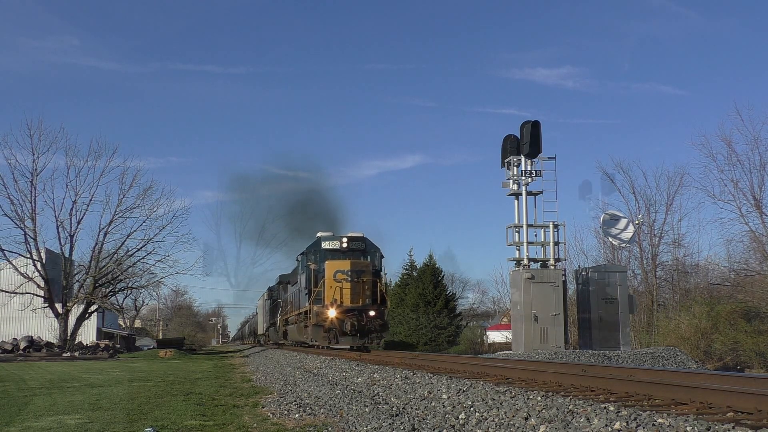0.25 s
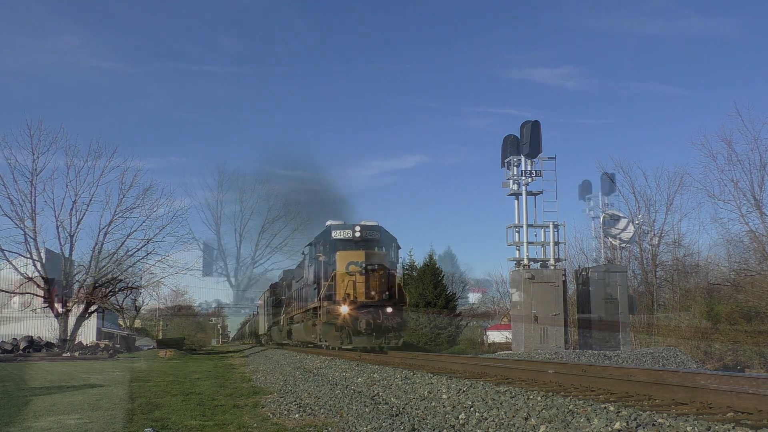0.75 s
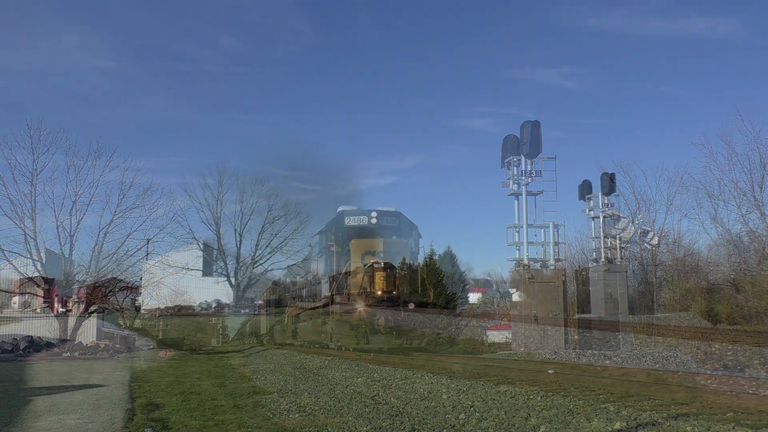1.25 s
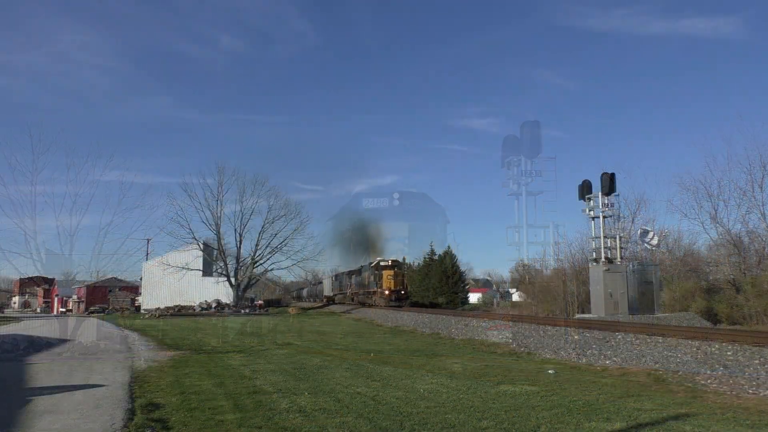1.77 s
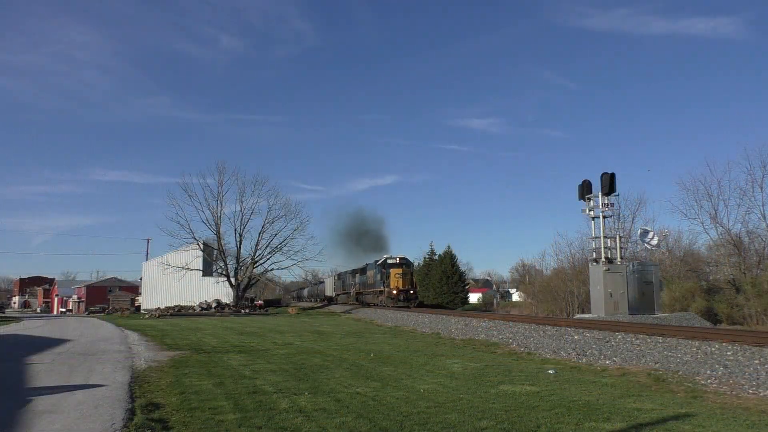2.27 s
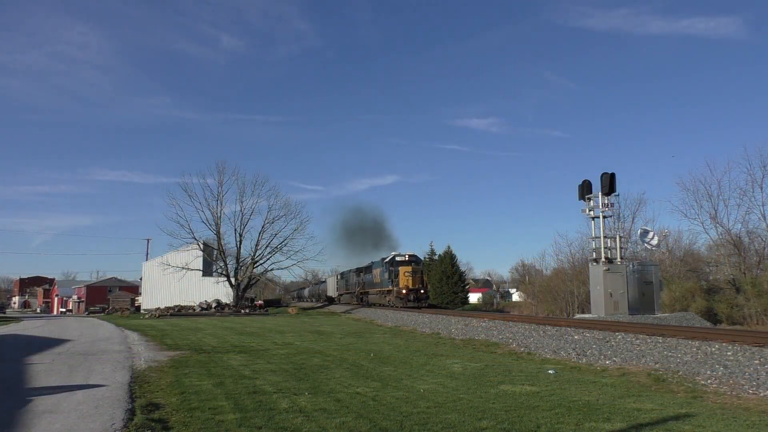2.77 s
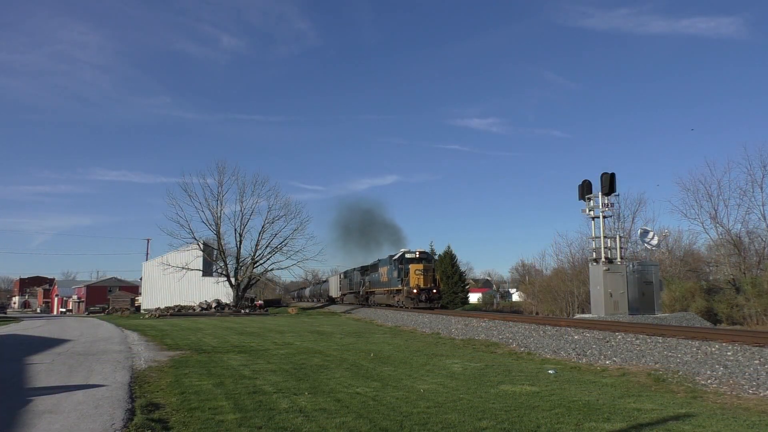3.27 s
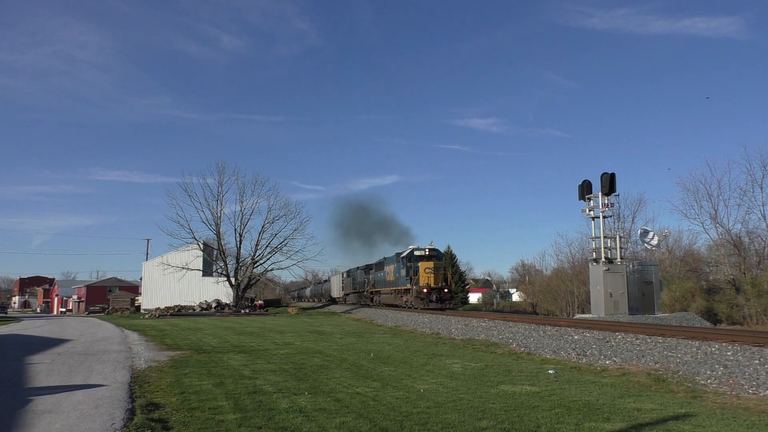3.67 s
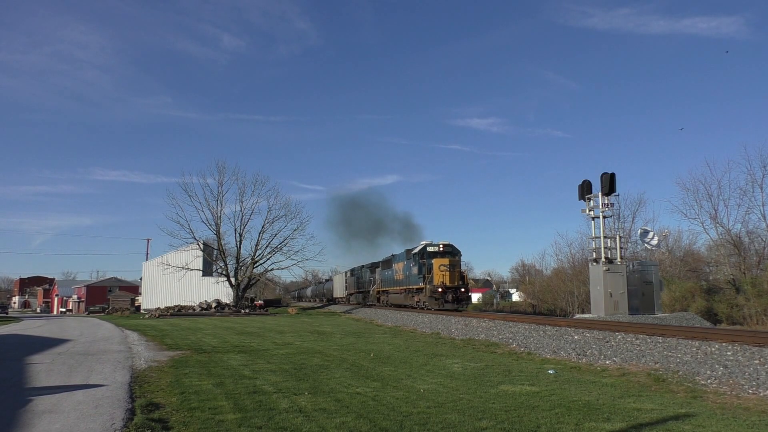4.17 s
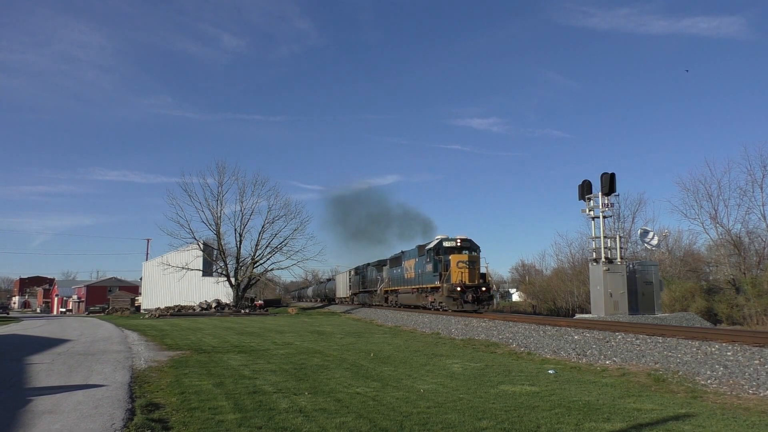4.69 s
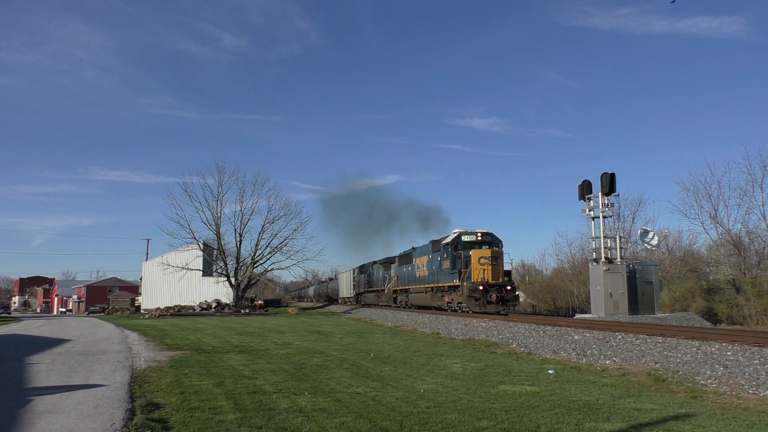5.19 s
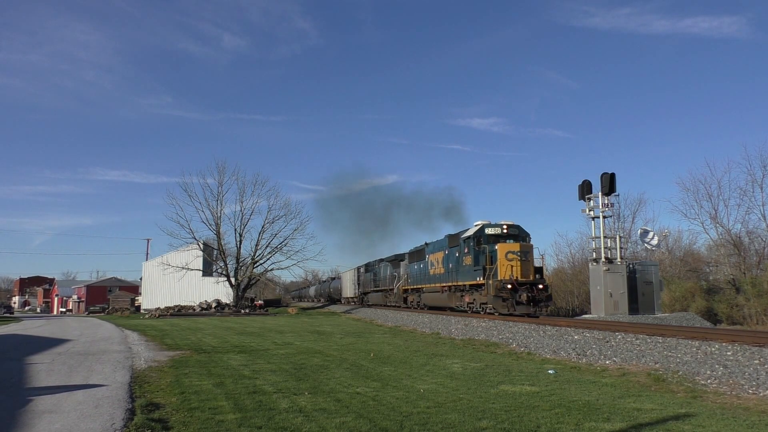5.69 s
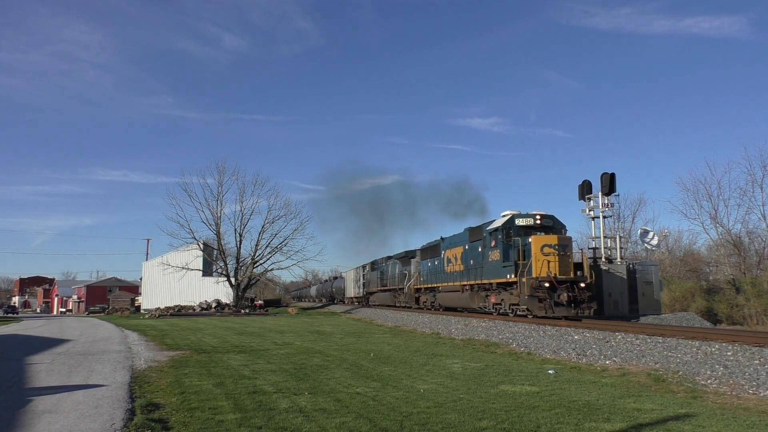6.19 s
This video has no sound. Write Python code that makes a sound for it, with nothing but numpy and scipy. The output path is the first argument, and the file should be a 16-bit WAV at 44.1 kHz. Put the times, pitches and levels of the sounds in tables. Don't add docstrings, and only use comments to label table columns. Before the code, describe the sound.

A close stereo microphone catches full, heavy diesel rumble and roar after a small low thump. It blends smoothly into a mono trackside perspective, duller at first. There the two engine pulses beat against each other, sag very slightly in pitch, and grow brighter with wheel hiss, light regular valve ticks and irregular clacks from joints and couplings. The train is still approaching when it stops.

```python
import sys
import numpy as np
from scipy import signal
from scipy.io import wavfile
from scipy.ndimage import uniform_filter1d, map_coordinates

SR = 44100
rng = np.random.default_rng(int(sys.argv[2]) if len(sys.argv) > 2 else 0)


def store_pcm(level_fs):
    pcm = np.round(np.clip(level_fs, -1, 1) * 32767).astype(np.int16)
    wavfile.write(sys.argv[1], SR, np.atleast_2d(pcm).T)


def ratio_of_db(decibels):
    return 10 ** (np.asarray(decibels, float) / 20)


N = 284004
T = np.arange(N) / SR
HZ = np.fft.rfftfreq(1024, 1 / SR)

# (time [s], four-stroke rate [cycles/s], two-stroke rate [turns/s])
CRANK_RATES = [(0, 8.945, 15.232), (3, 8.94, 15.238), (4.6, 8.935, 15.245), (5.4, 8.905, 15.236),
               (6.44, 8.86, 15.228)]
# (frequency [Hz], lead [rad])
LEFT_LEAD = [(0, 0), (1030, 2.2), (1720, 3.7), (1980, 5.5), (2240, 5.2), (2840, 5.8), (3270, 5.8),
             (3790, 4.9), (4050, 5.2), (4480, 5.1), (6460, 6.3), (12100, 6.2), (12500, 6.0), (15300, 6.5)]
# (frequency [Hz], density [dB/Hz])
RUMBLE_COLOUR = [(20, -36), (45, -20), (70, 13), (125, 9), (170, 10.5), (230, 8.5), (330, -47.5)]


def evened(x):
    return x / np.sqrt(np.mean(abs(x) ** 2) + 1e-20)


def read(points, hz):
    f, value = np.transpose(points)
    return np.interp(np.log(hz + 1), np.log(f + 1), value)


def drift(rate_hz):
    knots = rng.standard_normal(200)
    coarse = map_coordinates(knots, [T[::64] * np.clip(rate_hz, .1, 30)], order=3)
    return coarse.repeat(64)[:N]


def field(patchy_db, frames_wide, bins_wide):
    a, b, c, d, patches = rng.standard_normal((N // 256 + 5, 513, 5)).T
    patches = uniform_filter1d(patches, int(bins_wide), 0)
    patches = evened(uniform_filter1d(patches, int(frames_wide), 1))
    return np.array([a + 1j * b, c + 1j * d]) * ratio_of_db(patchy_db * patches)


def sound(z):
    return evened(signal.istft(z, nperseg=1024, noverlap=768)[1][..., :N])


def coloured(z, colour):
    return sound(z * ratio_of_db(read(colour, HZ))[:, None])


def band(x, lo_hz, hi_hz):
    return signal.sosfilt(signal.butter(4, [lo_hz, hi_hz], "band", fs=SR, output="sos"), x)


def distance(s):
    return 100 - 12 * s


def cycles():
    s, four, two = np.transpose(CRANK_RATES)
    return [2 * np.pi * np.cumsum(np.interp(T, s, rate)) / SR for rate in (four, two)]


def exhausts(angles):
    # (multiple of crank rate, close rms [dB], far rms [dB], echo phase at echo_at_s [turns])
    four_stroke = [(3, -70, -50, 0.54), (4, -52, -44, 0.62), (5, -48, -43, 0.76), (6, -53, -42, 0.6),
                   (7, -41, -39, 0.98), (8, -35, -27, 0.68), (9, -46, -36, 0.1), (10, -45, -31, 0.84),
                   (11, -26, -22, 0.5), (12, -35, -27, 0.16), (13, -34, -28, 0.62), (14, -32, -36, 0.18),
                   (15, -51, -40, 0.96), (16, -33, -25, 0.36), (18, -46, -38, 0.38), (19, -48, -38, 0.04),
                   (20, -40, -38, 0.02), (21, -47, -47, 0.94), (22, -48, -43, 0.96), (24, -48, -46, 0.92),
                   (25, -52, -47, 0.6), (26, -48, -41, 0.96), (27, -47, -45, 0.0), (29, -45, -46, 0.94)]
    # (multiple of crank rate, close rms [dB], far rms [dB], echo phase at echo_at_s [turns])
    two_stroke = [(3, -50, -44, 0.8), (4, -60, -36, 0.94), (5, -37, -36, 0.88), (6, -48, -32, 0.76),
                  (8, -30, -23, 0.84), (9, -36, -30, 0.98), (10, -22, -23, 0.18), (11, -32, -31, 0.5),
                  (13, -60, -45, 0.7), (14, -50, -43, 0.5), (16, -52, -51, 0.16), (24, -45, -49, 0.82)]
    echo_share, echo_ms_per_s, echo_at_s = (.7, .5), (.8, 2.62), 4.0
    throb_turns, throb_shape_turns = .33, .46
    close, far = np.zeros((2, N)), np.zeros(N)
    engines = zip(angles, (four_stroke, two_stroke), CRANK_RATES[0][1:], (False, True), echo_share, echo_ms_per_s)
    for angle, orders, rate_hz, in_step, echo, ms_per_s in engines:
        for k, close_db, far_db, echo_turns in orders:
            hz = k * rate_hz
            start_turns = rng.random(2)[0]
            if in_step:
                start_turns = k * throb_turns + throb_shape_turns
            far_start = 2 * np.pi * start_turns
            close_start = 2 * np.pi * (start_turns + k * .4)
            waver = ratio_of_db(1.5 * drift(2.4))
            wobble = .32 * drift(3.0)
            lead = np.interp(hz, *np.transpose(LEFT_LEAD)) * np.array([[.5], [-.5]])
            detour = 2 * np.pi * (hz * ms_per_s / 1000 * (T - echo_at_s) - echo_turns)
            wall = np.sqrt(1 + echo ** 2 + 2 * echo * np.cos(detour))
            close += ratio_of_db(close_db) * waver * np.cos(k * angle + close_start + wobble + lead)
            far += ratio_of_db(far_db) * wall * waver * np.cos(k * angle + far_start + wobble)
    sag_db = 0.6 - 5.5 * np.maximum(T - 0.42, 0)
    veil_db = -.2 + np.interp(T, (.6, 1.43), (-6., 0))
    gap_db = 3. * np.exp(-((T - 3.46) / 0.27) ** 2)
    return np.sqrt(2) * close * ratio_of_db(sag_db), np.sqrt(2) * far * ratio_of_db(veil_db + gap_db)


def close_roar():
    # (frequency [Hz], density [dB/Hz])
    roar_colour = [(120, -32), (200, -8), (287, -5), (326, -3), (427, -11), (683, -9.5), (775, -14.5),
                   (880, -12.5), (1170, -16), (1410, -19), (4550, -27.5), (13200, -51.5), (15000, -86)]
    # (frequency [Hz], correlation [0-1])
    likeness = [(60, 0.5), (300, 0.94), (700, 0.95), (1400, 0.21), (3000, 0.62), (6000, 0.55), (15000, 0.3)]
    # (frequency [Hz], left over right [dB])
    tilt = [(60, 0.0), (110, 0.0), (200, 0.0), (380, 2.5), (700, 4.5), (1290, 8.0), (2380, 7.0),
            (4400, 3.5), (8120, 0.5), (15000, 1.5)]
    a, b = field(1.0, 13, 10)
    same = np.clip(read(likeness, HZ), 0, 1)[:, None]
    lead = np.interp(HZ, *np.transpose(LEFT_LEAD))
    port = (ratio_of_db(read(tilt, HZ) / 2) * np.exp(.5j * lead))[:, None]
    z = np.array([a * port, (same * a + np.sqrt(1 - same ** 2) * b) / port])
    return ratio_of_db(-27.5) * coloured(z, roar_colour) + ratio_of_db(-29.5) * coloured(z, RUMBLE_COLOUR)


def splices():
    # (time [s], jump [dB])
    steps = [
        (.01828, -7.5),
        (2.0205, -29),
        (1.4466, -39),
    ]
    return sum(ratio_of_db(db) / 2 * np.sign(T - s) * np.exp(-abs(T - s) / 0.0011) for s, db in steps)


def whines():
    # (frequency [Hz], rms [dB])
    pitches = [(357.3, -50.5), (411.1, -50.5), (482.5, -50), (556, -43.5), (565.4, -53.5), (725, -47),
               (845.3, -51), (1111, -49), (1204, -53.5), (1721, -54.5)]
    tones = [ratio_of_db(db + 2.9 * drift(2.48)) * np.sin(2 * np.pi * hz * T + 1.34 * drift(3.0)) for hz, db in pitches]
    return np.sqrt(2) * sum(tones)


def layer_gain(level_db, share, loss_db_per_m):
    # (time [s], exposure [dB])
    exposure = [(.6, -7.5), (1.2, -6), (1.6, -6.5), (2.05, -5), (2.5, -5), (2.64, -2), (2.78, -2.5),
                (2.95, -1.6), (3.45, -0.4), (3.95, 0.2), (4.15, -.9), (4.4, 0.9), (4.65, -1.2), (5.1, 0.1),
                (5.3, 0.9), (5.55, 0.3), (6.05, 1.3), (6.44, 0.9)]
    exposure_db = np.interp(T, *np.transpose(exposure))
    return ratio_of_db(level_db + share * exposure_db - loss_db_per_m * distance(T))


def valve_gate(angle):
    beat = 3 * (angle - angle[round(3.246 * SR)]) / (2 * np.pi) + 300
    strength = rng.uniform(.2, 1.4, 600)[beat.astype(int)]
    age = (beat % 1) / 0.073
    return strength * age * np.exp(1 - age)


def far_roar(angle):
    # (frequency [Hz], density [dB/Hz])
    roar_colour = [(120, -42), (200, -7.5), (232, -8), (281, -5.5), (455, -8.5), (562, -6.5), (919, -14),
                   (1630, -20), (2200, -20), (2860, -46), (4840, -120)]
    # (frequency [Hz], density [dB/Hz])
    rail_colour = [(1000, -7), (1700, -10), (2110, -7), (2430, -5), (3140, 0), (3590, -3.5), (3890, -6.5),
                   (5600, -17), (7280, -33), (12300, -120)]
    # (frequency [Hz], density [dB/Hz])
    fizz_colour = [(2820, -40), (4800, -3.5), (6270, -0.5), (9670, -16.5), (11800, -25.5), (15300, -49),
                   (22000, -120)]
    # (frequency [Hz], density [dB/Hz])
    air_colour = [(9000, -23), (10500, -10), (11800, -8), (12400, -3), (13000, 1), (13500, -4),
                  (13900, -16), (15700, -26), (16000, -59)]
    low, mid = field(0.69, 14, 7.2)
    high, top = field(1.4, 5, 14)
    gate = valve_gate(angle)
    rumble = ratio_of_db(-26.5 + 0.6 * drift(2.32)) * coloured(low, RUMBLE_COLOUR)
    roar = layer_gain(-25, 0.49, .04) * coloured(mid, roar_colour)
    rails = layer_gain(-30, 0.97, 0.0087) * coloured(high, rail_colour) * evened(1 + 0.17 * gate)
    fizz = layer_gain(-41.5, 1.25, 0.094) * coloured(top, fizz_colour) * evened(1 + 0.39 * gate)
    early_air = ratio_of_db(-59 - 13.5 * T)
    air_gain = layer_gain(-49, .3, 0.46) + early_air
    air = air_gain * coloured(low, air_colour) * evened(1 + .25 * gate)
    return rumble + roar + rails + fizz + air


def ticks(angle):
    # (time [s], peak [dB])
    extra_ticks = [(2.2244, -41), (2.2364, -43), (2.6194, -42), (2.6604, -31), (2.82, -39), (2.9934, -43.5),
                   (3.8374, -38), (3.9934, -38), (4.0064, -36), (4.0287, -34), (4.0674, -37), (4.143, -25),
                   (4.1584, -27), (4.2574, -30), (4.3164, -35), (4.365, -25), (4.9317, -27), (5.3378, -31),
                   (5.7488, -37), (5.8614, -31.5), (5.9743, -30), (6.2447, -21)]
    valve_from_s, valve_at_s = 2.85, 3.2485
    turns = np.floor((angle - angle[round(valve_at_s * SR)]) / (2 * np.pi))
    beats = T[1:][(np.diff(turns) > 0) & (T[1:] > valve_from_s)]
    valve_db = -28 - .17 * distance(beats) + 2.5 * rng.standard_normal(60)[:len(beats)]
    rows = list(extra_ticks) + list(zip(beats, valve_db))
    out, t = np.zeros(N), np.arange(800) / SR
    shape = (1 - np.exp(-t / 0.0025)) ** 2 * np.exp(-t / 0.004)
    for (s, db), puff in zip(rows, rng.standard_normal((len(rows), len(t)))):
        at = round(s * SR)
        out[at:at + len(t)] += (ratio_of_db(db - 3.5) * puff * shape)[:N - at]
    return band(out, 4800, 9400) + ratio_of_db(-2.8) * band(out, 2300, 4600)


def knocks():
    # (time [s], peak [dB], lowest [Hz], highest [Hz], decay [s])
    joints = [
        (2.6735, -25., 3800, 6400, .004),
        (3.991, -17.5, 1400, 4800, .005),
        (4.006, -30., 4500, 6500, .006),
        (4.2575, -23., 2600, 4200, .004),
        (4.7015, -31., 2500, 8000, .006),
        (5.374, -29., 3000, 8000, .005),
        (3.837, -27., 2000, 5000, .01),
        (2.625, -28., 2700, 3400, .03),
        (3.205, -29., 2700, 3700, .02),
    ]
    out, t = np.zeros(N), np.arange(1200) / SR
    puffs = rng.standard_normal((len(joints), len(t)))
    for (s, db, lo_hz, hi_hz, decay_s), puff in zip(joints, puffs):
        shape = (1 - np.exp(-t / .002)) * np.exp(-t / decay_s)
        out[round(s * SR):][:len(t)] += ratio_of_db(db) * evened(band(puff, lo_hz, hi_hz)) * shape
    return out


def scene():
    angles = cycles()
    close, far = exhausts(angles)
    close = close + close_roar()
    far = far + whines() + far_roar(angles[0]) + ticks(angles[0]) + knocks()
    share = np.sin(np.pi / 2 * np.clip(T / 2.0, 0, 1)) ** 2
    return (1 - share) * close + share * far


def thinned(x, floor_db, from_hz):
    # (frequency [Hz], level [dB])
    side_kept = [(5800, 0.5), (6300, -58), (9100, -60), (9400, 1), (13400, -1), (13800, -60)]
    mid_side = np.array([x[0] + x[1], x[0] - x[1]]) / 2
    hz, _, z = signal.stft(mid_side, SR, nperseg=1024)
    power = (abs(z[:, :512]) ** 2).reshape(2, 32, 16, -1).mean(2).repeat(16, 1)
    power_db = 10 * np.log10(power + 1e-20)
    masker_db = uniform_filter1d(power_db[0, 190:260].mean(0), 40)
    keep = 1 / (1 + np.exp(-(power_db - floor_db - .35 * (masker_db + 83)) / .7))
    z[:, :512] *= np.where(hz[:512, None] > from_hz, keep, 1)
    z[1] *= ratio_of_db(read(side_kept, hz))[:, None]
    mid, side = signal.istft(z, SR, nperseg=1024)[1][:, :N]
    return np.array([mid + side, mid - side])


def top_cut(x):
    return signal.sosfilt(signal.butter(12, 15760, fs=SR, output="sos"), x)


def record(dry):
    rounded = np.tanh(dry / .85) * .88
    edited = thinned(rounded, floor_db=-88.5, from_hz=10000) + splices()
    limited = signal.oaconvolve(edited, signal.firwin(255, 15750, fs=SR)[None], "same")
    return top_cut(limited)


dry = scene()
out = record(dry)
store_pcm(out)
```